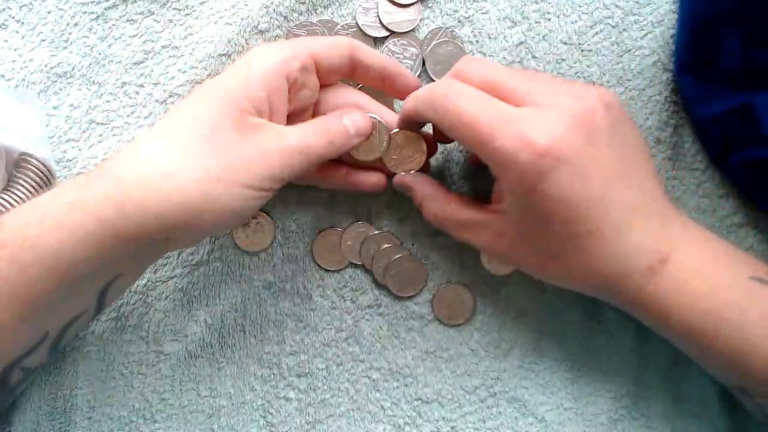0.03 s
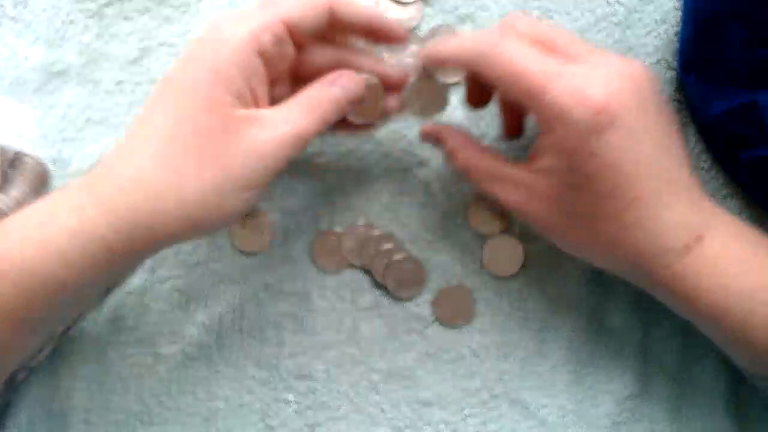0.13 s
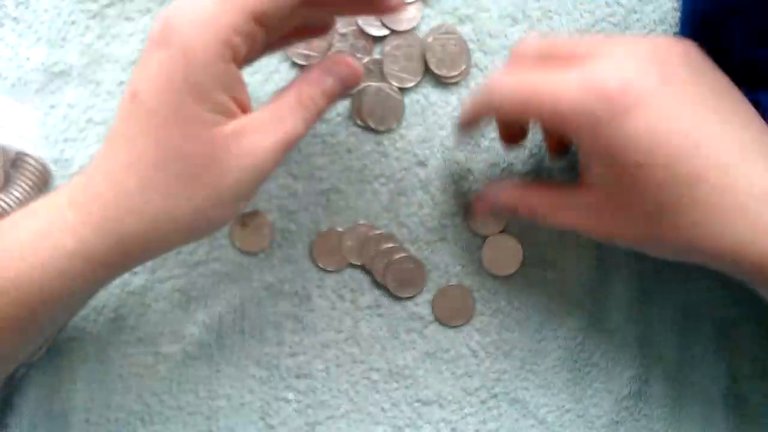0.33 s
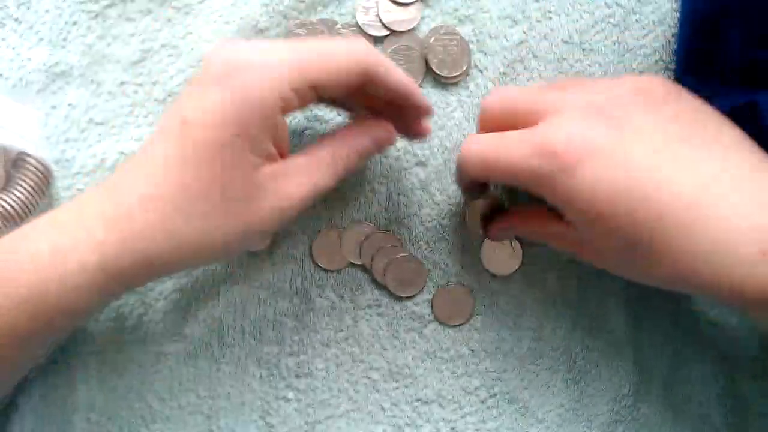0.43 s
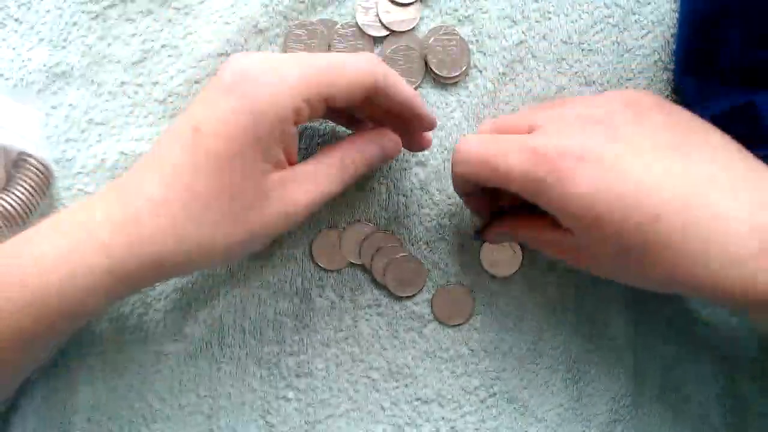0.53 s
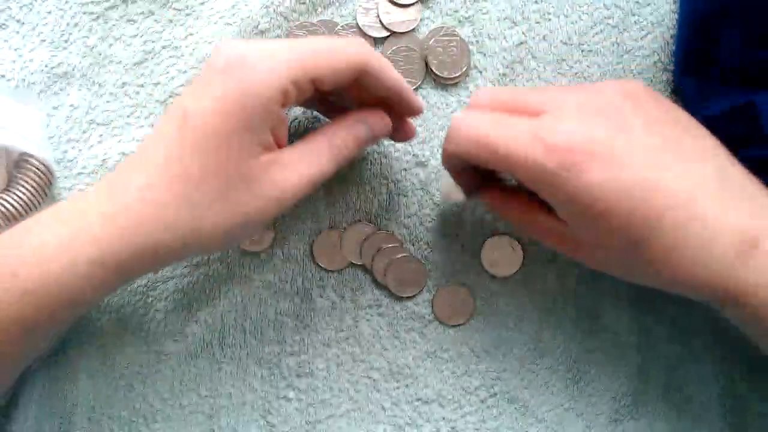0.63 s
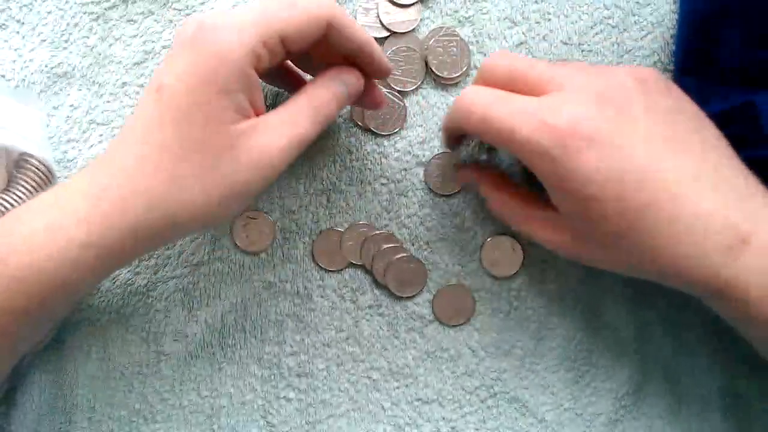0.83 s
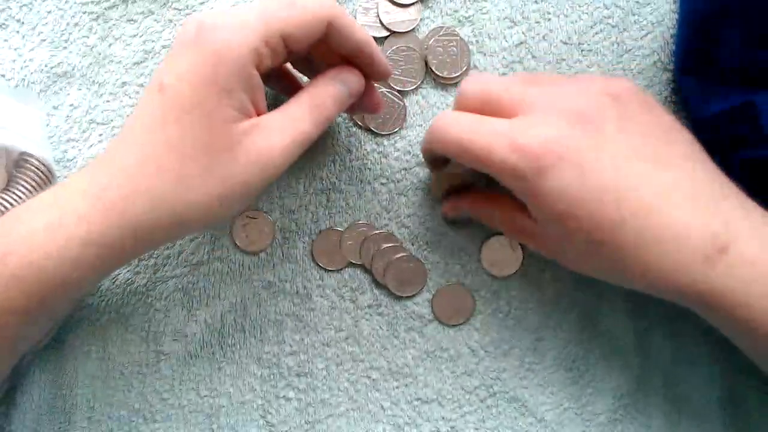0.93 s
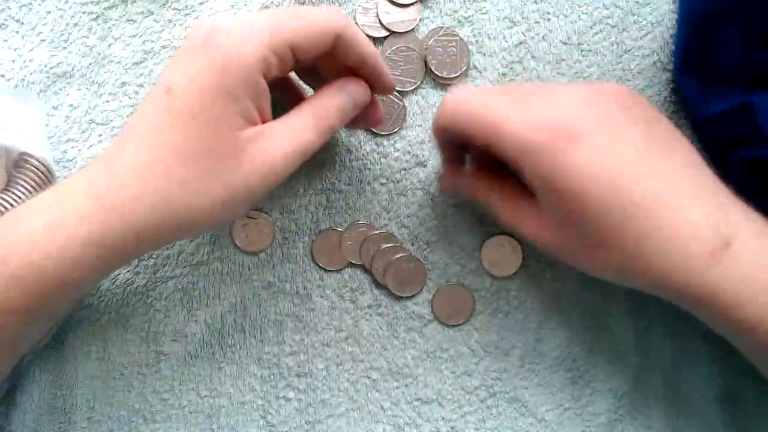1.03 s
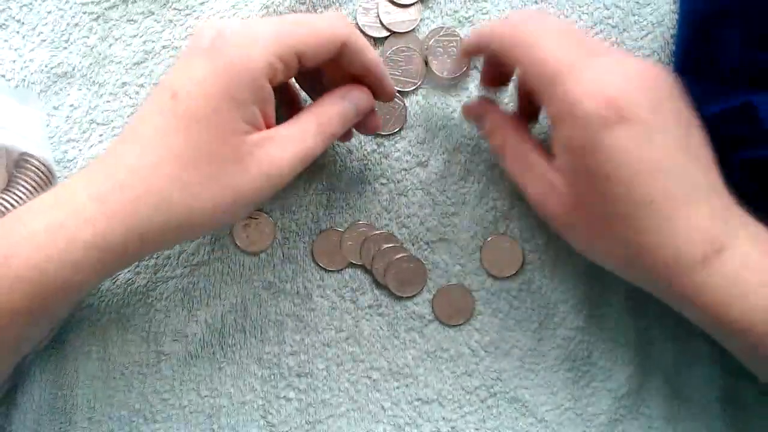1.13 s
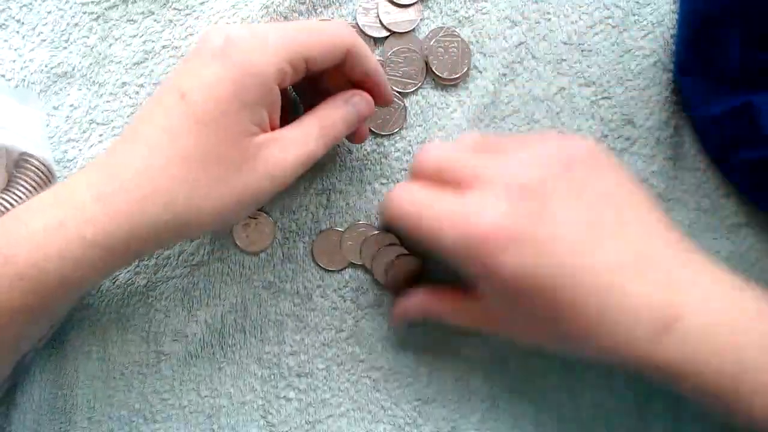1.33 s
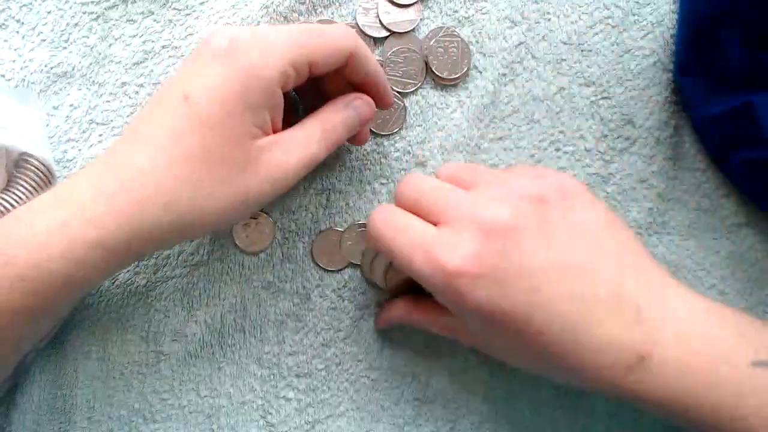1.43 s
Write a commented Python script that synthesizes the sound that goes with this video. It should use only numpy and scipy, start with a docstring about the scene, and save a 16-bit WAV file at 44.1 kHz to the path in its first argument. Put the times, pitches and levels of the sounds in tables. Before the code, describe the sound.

Coins clatter brightly as hands sort them on a towel-covered table. One coin ticks, a tiny squeak and a dull fingertip knock follow, then the coins clatter again, close to the microphone in a small quiet room.

```python
"""A low hum and a brief faint buzz in a small quiet room, then a clatter of coins sorted by hand.
Close to a dull microphone, rims clack and chatter against each other, coins slide over the heap,
and the table thuds under its towel. A held coin ticks, a short buzzy squeak follows, and a fingertip
bumps the table in one dull knock before the coins clatter again."""
import sys
import numpy as np
from scipy import signal
from scipy.fft import rfft, irfft
from scipy.io import wavfile

SR = 44100
rng = np.random.default_rng(int(sys.argv[2]) if len(sys.argv) > 2 else 0)


def store_pcm(level_fs):
    """Save levels as 16-bit WAV."""
    pcm = np.round(np.clip(level_fs, -1, 1) * 32767).astype(np.int16)
    wavfile.write(sys.argv[1], SR, np.atleast_2d(pcm).T)


N = 66150


def undb(db):
    return 10 ** (np.asarray(db) / 20)


def unit(x):
    """Scale to an energy of one."""
    return x / np.sqrt(np.sum(x ** 2) + 1e-18)


def clock():
    return np.arange(N) / SR


def fade(t60):
    """Exponential decay, 60 dB down after t60 seconds."""
    return undb(-60 * clock() / t60)


def swell(start, length):
    """Rounded rise and fall."""
    return np.sqrt(np.maximum(np.sin(np.pi * np.clip((clock() - start) / length, 0, 1)), 0))


def add(out, x, at):
    """Mix x in from a given time on."""
    i = round(at * SR)
    out[i:i + len(x)] += x[:N - i]


def convolve(x, response):
    return signal.fftconvolve(x, response)[:N]


def band(x, low_hz, high_hz):
    return signal.sosfilt(signal.butter(2, [low_hz, high_hz], "band", fs=SR, output="sos"), x)


def high_cut(x, hz):
    steep = signal.butter(8, hz, fs=SR, output="sos")
    return convolve(x, signal.sosfilt(steep, signal.unit_impulse(256)))


def colour(points):
    """Minimum-phase EQ response of unit energy through points (frequency [Hz], gain [dB])."""
    hz, db = np.array(points, float).T
    grid = np.arange(2049) * SR / 4096
    gain = undb(np.interp(np.log(grid + 1), np.log(hz), db))
    cepstrum = irfft(np.log(gain))
    causal_fold = np.r_[1, np.full(2047, 2), 1, np.zeros(2047)]
    return unit(irfft(np.exp(rfft(cepstrum * causal_fold))))


def tone(hz, db):
    """A steady sine at its rms level."""
    return np.sqrt(2) * undb(db) * np.sin(2 * np.pi * (hz * clock() + rng.random()))


def ring(modes):
    """Sum of decaying partials, unit energy."""
    return unit(sum(undb(db) * fade(t60) * tone(hz, 0) for hz, db, t60 in modes))


def grains(spread=0.38):
    """Dense tiny contacts of uneven strength, rms one."""
    strength = np.repeat(np.exp(spread * rng.standard_normal(N // 20 + 1)), 20)[:N]
    contacts = strength * rng.standard_normal(N)
    return contacts / contacts.std()


# EQ of the room noise (frequency [Hz], gain [dB])
AIR_EQ = [(25, -12.5), (51, -10.5), (75, -8.5), (150, 0), (250, -4.5), (400, -14), (900, -19.5),
          (1600, -23), (2000, -28.5), (3300, -35.5), (4500, -39.5), (6800, -40.5), (9000, -59.5),
          (11600, -76)]
# partials of the hum (frequency [Hz], level [dB])
HUM_TONES = [(74, -72.5), (143, -75.5)]


def room_tone(air_db=-65.5):
    """A bed of low room noise and steady hum."""
    air = signal.fftconvolve(rng.standard_normal(2 * N), colour(AIR_EQ))[N:2 * N]
    return undb(air_db) * air + sum(tone(hz, db) for hz, db in HUM_TONES)


# partials of the buzz (time [s], length [s], frequency [Hz], level [dB])
BUZZ_TONES = [(0.12, 0.046, 1252, -70), (.07, 0.089, 1497, -65), (.075, 0.083, 1746, -69.5),
              (0.049, 0.056, 2000, -73), (0.049, 0.11, 3500, -81), (0.052, 0.13, 5600, -85),
              (0.063, 0.12, 5000, -84)]


def buzz():
    """Faint overlapping tones swell and fade in a brief buzz."""
    return sum(swell(at, length) * tone(hz, db) for at, length, hz, db in BUZZ_TONES)


# coin slides over coins (time [s], length [s], level [dB])
COIN_SLIDES = [(0.09, 0.025, -70), (0.251, 0.071, -32), (0.32, 0.018, -35), (0.943, 0.075, -84.5),
               (1.175, 0.021, -45.5), (1.205, 0.024, -36), (1.359, 0.021, -49), (1.449, 0.04, -54.5)]


def slides():
    """Coins rub over the heap in short swells of gritty friction."""
    return grains() * sum(undb(db) * swell(at, length) for at, length, db in COIN_SLIDES)


# coin strikes coin; chatter and sends are relative to the strike
# (time [s], level [dB], chatter [dB], ring send [dB], heap send [dB])
COIN_STRIKES = [(0.2434, -22, -8.5, -15, -21), (0.2462, -0.5, 0.5, -16.5, -51.5),
                (0.2488, -6.5, 11, -15, -22.5), (0.25, 1.5, -10.5, -8, -17.5),
                (0.2521, -16, -5.5, -7.5, -9), (0.2664, -6.5, -4, -6.5, -19), (0.2696, -7, 3.5, -21, -14),
                (0.2776, -11, -9, -12, -35), (.2800, -11.5, -23, -17, -13), (0.2918, -15.5, -1, -9, -15),
                (0.3022, -14, -11, -4, -16), (0.3082, -10.5, -0.5, -23, -29), (0.329, -17.5, -0.5, -2, -12),
                (0.3585, -23.5, -8, -0.5, -11), (1.1555, -42.5, 10, 1, -20), (1.1592, -8.5, 4, 4.5, -25.5),
                (1.1637, -16.5, 6.5, 2, -24.5), (1.1873, -24, 2, 2.5, -18), (1.2098, -2, -5.5, -28, -30),
                (1.215, -29, 1, -22, -14), (1.223, -5.5, 1, -30, -39), (1.2284, -9.5, -0.5, -19, -17.5),
                (1.3401, -19, 2, 0, -28), (1.3488, -15, -6, -17, -40)]


def strikes(chatter_t60_s=0.018):
    """Rim hits rim: a click and a burst of chatter, with sends to the coins' ring and the heap."""
    force, ring_send, heap_send = np.zeros((3, N))
    for at, db, chatter_db, ring_db, heap_db in COIN_STRIKES:
        hit = undb(chatter_db) * unit(grains() * fade(chatter_t60_s))
        hit[0] += 1  # the click of first contact
        add(force, undb(db) * hit, at)
        add(ring_send, undb([db + ring_db]), at)
        add(heap_send, undb(db + heap_db) * hit, at)
    return force, ring_send, heap_send


# EQ of metal on metal (frequency [Hz], gain [dB])
CONTACT_EQ = [(150, -30.5), (400, -29), (800, -30.5), (1100, -26.5), (1500, -29.5), (2200, -11.5),
              (3000, -9), (3600, -0.5), (5000, 0), (7000, 0), (7600, -13), (8100, -35), (8600, -14.5),
              (9500, -39.5), (10500, -43), (12000, -51.5), (15000, -69)]
# short rings of the damped coins (frequency [Hz], level [dB], t60 [s])
COIN_RINGS = [(2750, -6, .04), (3590, 2, .045), (3785, 0.5, .05), (3776, 1, .055), (4188, -4, .07),
              (4530, -8, 0.0518), (4670, 2.5, .05), (5350, 2, .055), (5800, -1, .08), (6340, -5, .045),
              (6570, 2.5, .05), (6810, -6, .05)]
# clacks of the heap (frequency [Hz], level [dB], t60 [s])
HEAP_CLACKS = [(336.6, -4.5, .04), (439, -7, .04), (709, -6.5, .05), (1063, -5.5, .04), (1130, -2, 0.079),
               (1400, -2.5, .015), (1650, 2.5, .02), (1920, 3, 0.027)]


def coins(slide_ring_db=-8, slide_heap_db=-21.5):
    """Strikes and slides give a bright attack, ring the damped coins and clack the heap beneath."""
    force, ring_send, heap_send = strikes()
    friction = slides()
    attack = convolve(force + friction, colour(CONTACT_EQ))
    ring_drive = band(ring_send + undb(slide_ring_db) * friction, 2300, 7200)
    heap_drive = band(heap_send + undb(slide_heap_db) * friction, 250, 2400)
    rings = convolve(ring_drive, ring(COIN_RINGS))
    clacks = convolve(heap_drive, ring(HEAP_CLACKS))
    return attack + high_cut(rings, 7600) + high_cut(clacks, 4500)


# the padded table takes the weight (time [s], length [s], level [dB])
TABLE_PUSHES = [(0.244, 0.0199, -48), (0.276, 0.021, -42.5), (0.32, 0.013, -50.5), (1.2, 0.062, -44)]
# booms of the padded table (frequency [Hz], level [dB], t60 [s])
TABLE_BOOMS = [(143.4, 0, .14), (209.5, -5, .07), (260, -14, .06), (320, -16, .06), (612, -20, .08)]


def thuds(grit_db=-6.5):
    """Soft pushes through the towel boom the table's lowest mode and rattle the higher ones."""
    out = np.zeros(N)
    lowest_hz = TABLE_BOOMS[0][0]
    for at, length, db in TABLE_PUSHES:
        push = swell(0, length)
        boom = unit(convolve(push * np.sin(2 * np.pi * lowest_hz * clock()), ring(TABLE_BOOMS[:1])))
        rattle = unit(convolve(push * grains(), ring(TABLE_BOOMS[1:])))
        weight = undb(db) * np.sqrt(length * SR)  # a longer push carries more energy
        add(out, weight * (boom + undb(grit_db) * rattle), at)
    return band(out, 55, 900)


# light ticks of a coin held in the fingers (time [s], level [dB])
HELD_TICKS = [(0.493, -20), (0.5022, -38.5)]
# choked ring of that coin (frequency [Hz], level [dB], t60 [s])
HELD_RINGS = [(3306, -6, 0.015), (4416, -1.5, 0.0079), (5066, -1.5, 0.013), (6780, -8, 0.011)]


def ticks(scrape_db=-10.5, scrape_t60_s=0.036):
    """A pinched coin scrapes and rings for only a few milliseconds."""
    out = np.zeros(N)
    for at, db in HELD_TICKS:
        scrape = unit(band(grains() * fade(scrape_t60_s), 2500, 6370))
        add(out, undb(db) * (ring(HELD_RINGS) + undb(scrape_db) * scrape), at)
    return high_cut(band(out, 1400, 6000), 8380)


def squeak(start_s=0.559, length_s=0.015, pitch_hz=1488, throb_hz=256.4, level_db=-36):
    """A short buzzy squeak: one rough tone throbs as it swells, with a little rasp above."""
    t = clock() - start_s
    envelope = np.sqrt(np.interp(t, [0, 0.63 * length_s, length_s], [0, 1, 0]))
    throb = np.sin(np.pi * throb_hz * t)  # one pulse each half cycle
    rough = high_cut(band(rng.standard_normal(N), 1250, 1860), 2830)
    rasp = high_cut(band(rng.standard_normal(N), 3300, 4700), 4400)
    texture = undb(-6) * rough / rough.std() + undb(-21) * rasp / rasp.std()
    return undb(level_db) * envelope * throb * (np.sin(2 * np.pi * pitch_hz * t) + texture)


# fingertip bumps that merge into one knock (time [s], level [dB])
FINGER_BUMPS = [(0.7357, -10.5), (0.7426, -18), (.752, -16), (0.7597, -22)]
# body of the knocked table (frequency [Hz], level [dB], t60 [s])
KNOCK_BODY = [(140.4, -4.5, .16), (198, 2.5, 0.17), (304, -7, .11), (432, -11.5, 0.15), (459.6, -5, 0.11),
              (584, -7, 0.23), (707.5, -11.5, 0.25), (831, -17.5, 0.32), (872, -12.5, 0.14),
              (1100, -29, 0.18), (1324, -18, 0.12)]


def knock(scuff_db=-7, scuff_t60_s=0.21):
    """A fingertip bumps over the table: many low modes and a dull scuff."""
    out, body = np.zeros(N), ring(KNOCK_BODY)
    for at, db in FINGER_BUMPS:
        scuff = unit(band(rng.standard_normal(N), 130, 820) * fade(scuff_t60_s))
        add(out, undb(db) * (body + undb(scuff_db) * scuff), at)
    return high_cut(band(out, 60, 1410), 1540)


# brief dips of the treble (time [s], length [s], gain [dB])
TREBLE_DIPS = [(1.17, 0.015, -16), (1.195, 0.014, -32)]


def dip_treble(x, above_hz=3700):
    """The treble ducks twice for a few milliseconds in the second clatter."""
    low = signal.sosfiltfilt(signal.butter(2, above_hz, fs=SR, output="sos"), x)
    treble_db = sum(db * swell(at, length) ** 2 for at, length, db in TREBLE_DIPS)
    return low + (x - low) * undb(treble_db)


# reverb tail of the small room, by band (centre [Hz], level [dB], t60 [s])
REVERB_BANDS = [(200, -7, .35), (715, -3.5, 0.22), (1756, -10.5, 0.2), (4100, -15, 0.32),
                (6990, -22.5, 0.35), (9000, -18.5, 0.22)]


def room(dry, early_db=-10.5, early_t60_s=0.081, build_up_s=0.012):
    """Quick reflections from nearby things, then a short diffuse tail."""
    onset = np.clip(clock() / build_up_s, 0, 1)
    hz = np.arange(N // 2 + 1) * SR / N
    centres = np.log([row[0] for row in REVERB_BANDS])
    noise, tail = rfft(rng.standard_normal(N)), 0
    for share, (_, db, t60) in zip(np.eye(len(REVERB_BANDS)), REVERB_BANDS):
        crossover = np.interp(np.log(hz + 1), centres, share)
        tail += undb(db) * irfft(noise * crossover, N) * unit(fade(t60) * onset)
    early = undb(early_db) * unit(grains() * fade(early_t60_s) * onset)
    return convolve(dry, early + tail)


def scene(detail_send_db=-4):
    """Coins, ticks and squeak feed the reverb; the table and the background stay dry."""
    clatter, details = coins(), ticks() + squeak()
    reverb = room(clatter + undb(detail_send_db) * details)
    foreground = dip_treble(clatter + details + reverb)
    return (foreground + thuds() + knock() + room_tone() + buzz())[None]


def record(dry, top_hz=15500):
    """The recorder cuts the top with a steep low-pass."""
    return signal.sosfilt(signal.ellip(8, .2, 70, top_hz, fs=SR, output="sos"), dry)


dry = scene()
out = record(dry)
store_pcm(out)
```